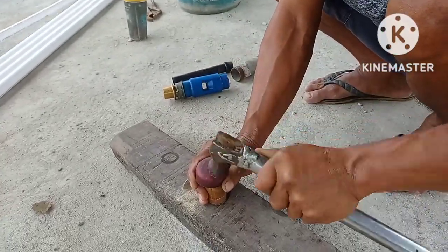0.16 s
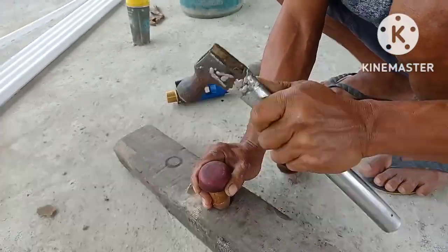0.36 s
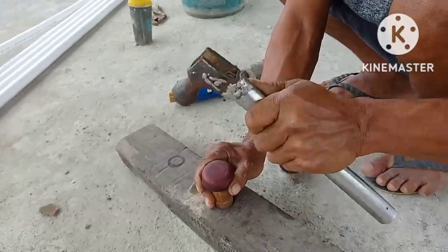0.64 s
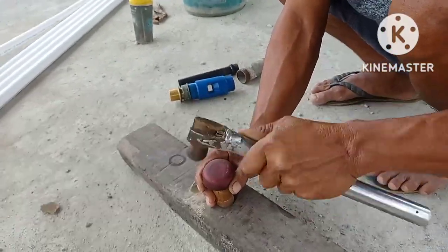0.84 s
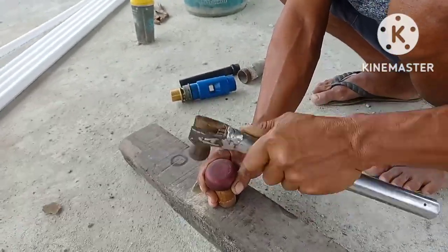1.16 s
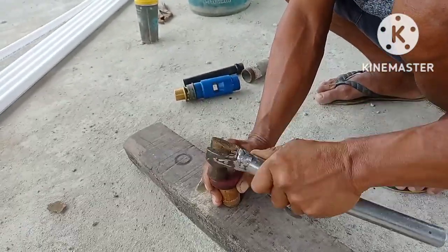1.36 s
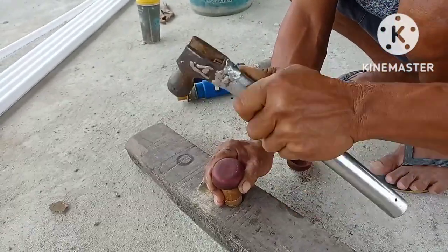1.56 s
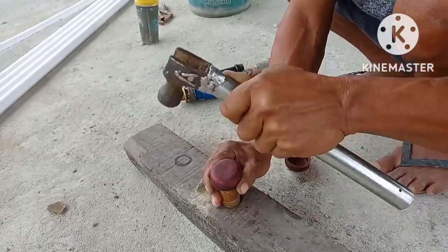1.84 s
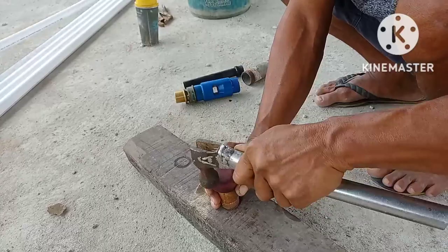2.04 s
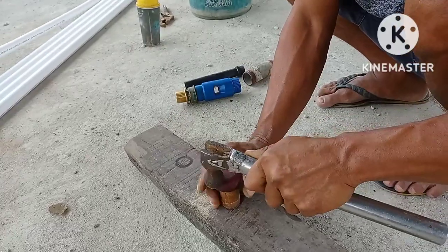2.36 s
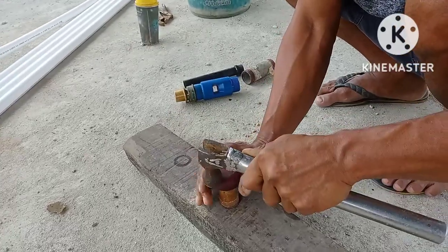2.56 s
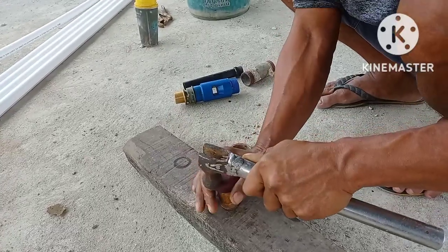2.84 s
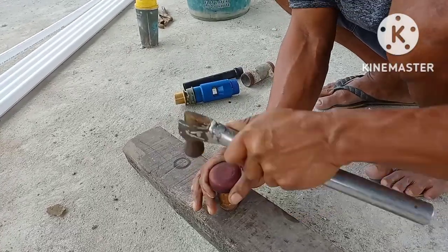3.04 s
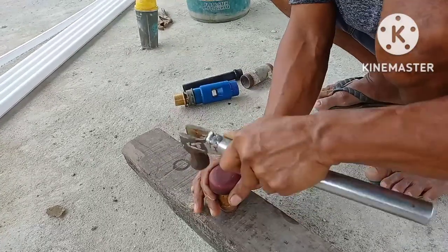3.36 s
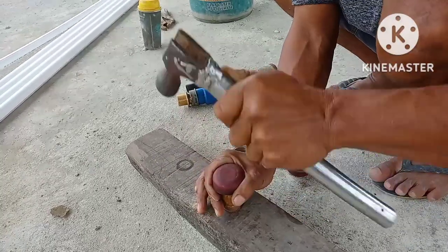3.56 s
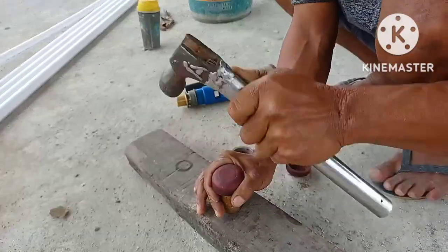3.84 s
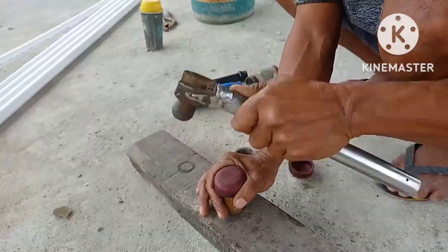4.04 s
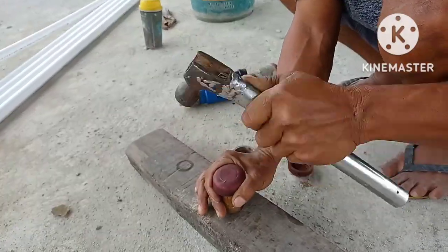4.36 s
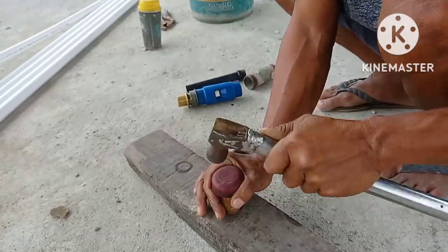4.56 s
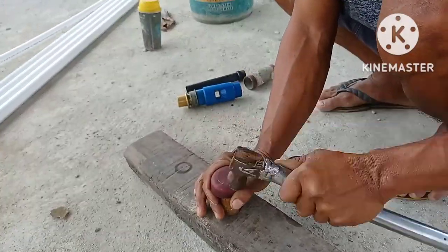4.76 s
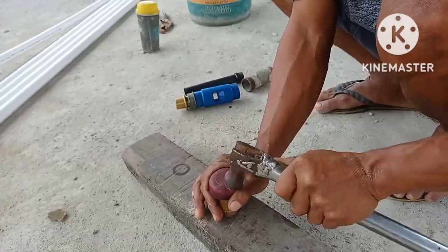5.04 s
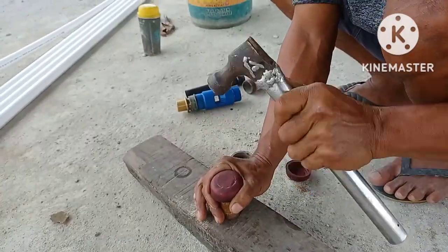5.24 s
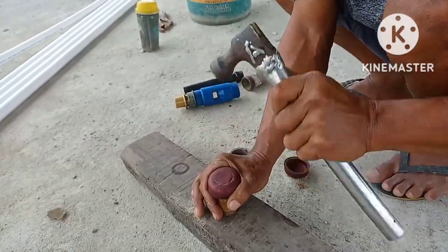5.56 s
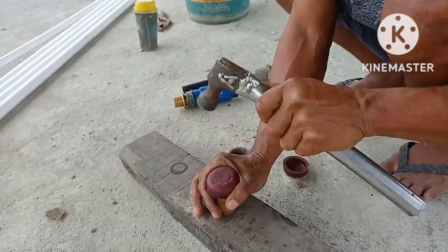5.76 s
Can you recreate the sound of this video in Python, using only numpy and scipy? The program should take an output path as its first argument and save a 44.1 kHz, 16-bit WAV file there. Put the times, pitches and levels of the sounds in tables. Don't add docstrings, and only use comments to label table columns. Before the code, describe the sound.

Seventeen loud, dry hammer knocks with a sharp steel crack and walled-yard echoes, broken by a gap of small metallic clinks and handling.

```python
import sys
import numpy as np
from scipy import signal
from scipy.fft import rfft, irfft, next_fast_len
from scipy.io import wavfile
from scipy.ndimage import uniform_filter1d, minimum_filter1d, map_coordinates

SR = 44100
rng = np.random.default_rng(int(sys.argv[2]) if len(sys.argv) > 2 else 0)


def master_out(mix):
    frames = np.transpose(np.atleast_2d(mix))
    ceiling = np.clip(frames, -1, 1)
    pcm = np.round(ceiling * 32767).astype(np.int16)
    wavfile.write(sys.argv[1], SR, pcm)


def volts(x):
    e = np.asarray(x, float) / 20
    return 10 ** e


N = 259749
T = np.arange(SR // 4) / SR

# (time [s], peak [dB], thud [dB], high ring [dB], echo [dB])
BLOWS = [(0.02, 1.5, -30.5, -10, 3), (0.319, 2.5, -30, -8.5, 2), (0.631, 2.5, -29, -9.5, 2),
         (0.922, 0, -29.5, -6.5, 3.5), (1.226, 5, -26.5, -9, 4), (1.526, 5.5, -29.5, -9, 5),
         (1.825, 4, -24, -8, 4.5), (2.128, 7, -26.5, -9.5, 6), (3.449, 7, -24.5, -9.5, 6.5),
         (3.772, 7.5, -34.5, -10, 5), (4.059, 5.5, -27, -12.5, 3.5), (4.344, 6.5, -28, -13.5, 4.5),
         (4.628, 7, -27, -11.5, 3), (4.934, 3, -37, -7.5, 4), (5.216, 2, -34.5, -7, 3),
         (5.486, 8, -36.5, -13.5, 5), (5.776, 7.5, -27, -14, 4)]
# (frequency [Hz], level [dB], t60 [s])
BLOCK_MODES = [(827.3, -7, 0.021), (1072.5, -4.5, 0.02), (1490, .6, 0.017), (1657, -4, 0.018)]
# (frequency [Hz], level [dB], t60 [s])
PUNCH_MODES = [(2112, 1.5, 0.021), (2279, -8.5, 0.028), (2520, -1.5, 0.017), (2763, -7.5, 0.023),
               (3059, -11.5, 0.021), (3576, -10, 0.01)]
# (frequency [Hz], level [dB], t60 [s])
THUD_MODES = [(156.6, -16, 0.013), (280.5, 6, 0.02)]
# (frequency [Hz], level [dB], t60 [s])
BEND_MODES = [(449, 5, 0.024), (570, -2, .02)]
# (frequency [Hz], level [dB], t60 [s])
HEAD_MODES = [(5840, -46, .13)]
# (frequency [Hz], level [dB])
KNOCK_SPECTRUM = [(300, 3), (700, -9.5), (1500, -3.5), (2500, -2), (3500, -11.5), (5000, -27.5)]
# (frequency [Hz], level [dB])
CRACK_SPECTRUM = [(2500, -64), (4500, -14), (7000, 12), (10000, -0.5), (15000, -11)]
# (time [s], peak [dB], pitch [Hz], brightness [dB])
CLINKS = [(0.2608, -44, 3500, -10), (0.2843, -48, 3500, -4), (0.5826, -34, 2400, -18),
          (0.7463, -20.5, 2600, -33), (1.6033, -18, 3000, -22), (1.727, -9, 3400, -11),
          (1.8798, -10.5, 3720, -11), (2.609, -22, 2600, -15), (2.71, -31, 2600, -15),
          (2.8123, -30.5, 2000, -9), (2.8337, -27, 2200, -28), (2.885, -32, 2460, -26),
          (3.0794, -44, 2770, -19), (3.0964, -33, 3780, -9), (3.1143, -28.5, 3790, -5.5),
          (3.1324, -36, 3980, -13), (3.147, -39, 3940, -25), (3.176, -33, 3000, -20),
          (3.341, -32.5, 3050, -12), (3.44, -22, 4000, -1), (3.767, -11, 2470, -21),
          (3.952, -24, 2540, -33), (4.0243, -30, 3940, -28), (4.054, -12, 2480, -14),
          (4.5187, -31.5, 3980, -18), (4.7205, -17, 2300, -28), (4.776, -36.5, 2600, -7),
          (5.7374, -14.5, 3180, -13)]
# (frequency [Hz], level [dB], t60 [s])
CUP_MODES = [(1490, 1, .045), (2460, -1, .05), (2780, -1, .07), (3640, 0, .035), (3950, 0, .04),
             (4770, -2, .05), (6300, -17, .07), (9000, -13, .06), (10070, -26, .1), (11440, -8, .04),
             (13760, -24, .15), (14200, -34, .15)]
# (time [s], tick [dB], brightness [dB], ring [dB], favoured frequency [Hz])
CUP_TOUCHES = [(0.7961, -17.5, -25, -21, 8000), (0.822, -27, -12, -38, 9000),
               (0.8624, -37, -21, -34, 11400), (1.0335, -21, -22, -20, 4000), (1.14, -40, -30, -39, 4770),
               (1.3841, -30, -18, -30, 4770), (1.631, -24, -22, -40, 5000), (2.666, -23, -26, -25, 3300),
               (2.7243, -10, -19, -15, 3950), (2.77, -36, -30, -38, 3640), (2.8425, -21, -21, -19, 3640),
               (2.97, -38, -22, -31, 4770), (2.9867, -33, -15, -27, 2460), (3.0085, -27, -34, -25, 2600),
               (3.0624, -37, -23, -36, 3640), (3.1633, -29, -14, -15, 2780), (3.353, -39, -6, -34, 3950),
               (3.37, -44, -6, -36, 3950), (3.39, -44, -10, -37, 3950), (5.351, -23, -39, -38, 4770)]
# (frequency [Hz], level [dB], t60 [s])
TUBE_MODES = [(5450, 0, .05), (6150, -9, .055), (7490, -3, .045), (8060, 0, .045), (9120, -12, .07),
              (10460, -9, .055), (12020, -5, .03), (12640, -9, .035), (13170, -22, .06), (15130, -9, .04)]
# (time [s], tick [dB], brightness [dB], ring [dB], favoured frequency [Hz])
TUBE_TOUCHES = [(0.784, -20, -15, -43, 10400), (1.0514, -20, -15, -30, 8500), (1.3845, -26, -26, -35, 9500),
                (1.4764, -24, -20, -31, 6000), (1.489, -20, -8, -31, 8060), (1.6494, -25, -24, -44, 10400),
                (1.77, -38, -10, -40, 9120), (3.6283, -14.5, -18, -20, 7800), (3.6727, -8, -18, -21, 6500),
                (3.681, -1, -13, -17, 7500), (3.726, -30, -21, -34, 8060)]
# (time of maximum [s], level [dB], rise [s], fall [s])
SCUFFS = [
    (.264, -51.5, 0.028, .04),
    (3.37, -68, .3, .15),
    (3.69, -44, .01, 0.074),
    (4.232, -70, .13, .2),
    (4.518, -49, .012, .055),
    (4.87, -66, 0.28, 0.049),
]
# (frequency [Hz], level [dB])
GRIT_SPECTRUM = [(2500, -16), (4200, 0), (6000, -9), (8000, -3), (10300, -5), (12000, -9), (13700, -4),
                 (15200, -10)]
# (time of maximum [s], level [dB], rise [s], fall [s])
JINGLES = [
    (.8, -47, .02, .25),
    (1.1, -59, .06, .3),
    (1.93, -60, .03, .3),
    (2.76, -59, .03, 1.6),
    (5.36, -59, 0.014, .2),
]
# (frequency [Hz], bandwidth [Hz], level [dB])
LOOSE_RESONANCES = [(2790, 40, -5), (3640, 40, -6), (4030, 40, -12), (4780, 40, 0), (6300, 40, -9),
                    (11500, 50, -14)]
# (delay [s], level [dB], flutter [dB], strongest frequency [Hz])
ECHOES = [(0.044, 10, -14, 1000), (0.051, 8, -6, 1400), (.059, 9, -14, 2400), (0.112, 5, -12, 2320),
          (0.151, 4, -3, 1400), (.2, -3, -4, 1400)]
# (delay [s], level [dB])
SWELL = [(.042, -48), (.044, 9.5), (.07, 0.5), (.09, -6), (.135, -2), (.15, 4), (.25, -1), (.4, -6.5),
         (.7, -28)]
# (frequency [Hz], level [dB])
YARD_SPECTRUM = [(120, -40), (200, -31), (236, -20.5), (446, -15), (599, -20.5), (817, -4.5), (1120, -7),
                 (1380, -2.5), (1570, -8), (2370, -4.5), (3870, -21), (6430, -54), (7950, -42),
                 (10000, -51), (13000, -95), (22000, -120)]
# (frequency [Hz], t60 [s])
AIR_LOSS = [(500, 1.05), (2000, 1.21), (5000, 0.8), (9000, 0.84)]
# (frequency [Hz], level [dB], t60 [s])
FLUTTER_MODES = [(390, 6, .022), (450, 4, 0.022), (830, 4, 0.027), (1000, 4, .028), (1240, 6, .022),
                 (1370, 4, 0.02)]
# (frequency [Hz], level [dB])
FLOOR_SPECTRUM = [(200, -8), (400, -2), (800, -4), (1300, -7.5), (2460, -2), (3770, -11.5), (5000, -26),
                  (6400, -33), (7600, -18.5), (8300, -15.5), (9400, -28.5), (11200, -45), (15000, -46)]
# (frequency [Hz], level [dB])
RUMBLE_SPECTRUM = [(25, -25), (60, -2), (130, 6), (200, -1), (400, -16)]
# (time [s], level [dB])
WIND = [(0.0, -57), (0.13, -55), (0.64, -56), (1.06, -50), (1.52, -55), (2.02, -54), (2.28, -55),
        (3.2, -52), (3.33, -49), (3.46, -54), (3.76, -59), (5.25, -55), (5.76, -58), (5.89, -55)]
# (time of maximum [s], level [dB], rise [s], fall [s])
RUSTLES = [
    (3.245, -69, .06, .05),
    (3.3, -67, .03, .07),
    (3.375, -63, .1, .09),
    (4.25, -72, .1, .12),
    (4.83, -72, .1, .12),
]


def hammer():
    out = np.zeros(N)
    phase = 70 * T + 1.02 * (1 - np.exp(-T / 0.0029))
    thump = np.sin(2 * np.pi * phase) * volts(-60 * T / 0.038) * (1 - np.exp(-T / 0.0005))
    for s, db, thud_db, high_db, _ in BLOWS:
        crack_db = -16 + 0.6 * (high_db + 10)
        bend_db = 1.8 * min(db - 5.5, 1)
        low = 0.51 * ring(THUD_MODES, 0.00051) + 0.97 * thump
        low += 0.52 * volts(bend_db) * ring(BEND_MODES, 0.0005)
        modes = ring(BLOCK_MODES, 0.001) + volts(high_db + 9.5) * ring(PUNCH_MODES, 0.00097)
        modes += volts(thud_db + 13.5) * low
        noise = volts(-11) * burst(KNOCK_SPECTRUM, 0.03)
        noise += volts(crack_db - 5) * burst(CRACK_SPECTRUM, 0.014)
        noise += volts(-23.5) * burst(YARD_SPECTRUM, 0.079)
        leather = burst(KNOCK_SPECTRUM, 0.037) * (1 - np.exp(-T / 0.0024))
        add(out, s - 0.003, volts(db - 17) * leather)
        add(out, s, volts(db + 20.5) * (1 - np.exp(-T / 0.00056)) * (noise - modes))
        add(out, s + 0.005, volts(rng.normal(0, 2.5)) * ring(HEAD_MODES, 0.0013))
    return out


def clinks():
    out = np.zeros(N)
    for s, db, hz, bright_db in CLINKS:
        add(out, s, tick(db, hz, bright_db))
    for modes, touches in [(CUP_MODES, CUP_TOUCHES), (TUBE_MODES, TUBE_TOUCHES)]:
        for s, db, bright_db, ring_db, hz in touches:
            focus_db = 7 - 0.75 * (db + 12)
            contact = tick(db, np.clip(hz, 2400, 3600), bright_db)
            add(out, s, contact + loose_steel(modes, ring_db, hz, focus_db))
    return out


def tick(db, hz, bright_db):
    t60 = max(0.022 + 0.0003 * (db + 25), 0.012)
    body = burst([(hz / 4.9, -20), (hz, 0), (hz * 1.5, -11)], 3 * t60)
    spit = volts(bright_db) * burst([(5000, -10), (8000, 15), (14500, -4)], 2.2 * t60)
    stray_modes = [(hz * rng.uniform(0.6, 1.35), -3, 3 * t60) for _ in range(4)]
    partials = ring(stray_modes, 0.00051)
    envelope = volts(db - 45 * (T / t60) ** 2) * (1 - np.exp(-T / 0.0012))
    return envelope * (body + 0.45 * partials + spit)


def loose_steel(modes, db, favoured_hz, focus_db):
    hz, mode_db, t60 = np.transpose(modes)[:, :, None]
    luck = rng.standard_normal((len(modes), 40))
    waver = 3.5 * np.array([map_coordinates(row, [T * 120]) for row in luck])
    waver = waver + 3 * luck[:, -1:]
    focus = focus_db * np.abs(np.log2(hz / favoured_hz))
    level = db + mode_db - focus + waver - 60 * T / t60
    return (volts(level) * np.sin(2 * np.pi * hz * T)).sum(0) * (1 - np.exp(-T / 0.0017))


def scuffs():
    lumps = volts(8 * held_noise(64))
    grit = unit(coloured(lumps * rng.standard_normal(N), GRIT_SPECTRUM))
    f = np.fft.rfftfreq(N, 1 / SR)
    response = sum(volts(db) * 1j * f * width / (centre ** 2 - f * f + 1j * f * width)
                   for centre, width, db in LOOSE_RESONANCES)
    touches = volts(6 * held_noise(256)) * rng.standard_normal(N)
    jingle = unit(irfft(rfft(touches) * response ** 2, N))
    return volts(10) * spans(SCUFFS) * grit + volts(3.5) * spans(JINGLES) * jingle


def yard():
    delay = np.arange(SR * 3 // 4) / SR
    swell = volts(np.interp(delay, *np.transpose(SWELL)))
    hz, t, z = signal.stft(swell * rng.standard_normal(len(delay)), SR, nperseg=256)
    clumps = uniform_filter1d(rng.standard_normal(z.shape), size=2, axis=0)
    clumps = unit(uniform_filter1d(clumps, size=4, axis=1))
    same = signal.istft(z * volts(3.5 * clumps - 1.5), SR, nperseg=256)[1][:len(delay)]
    # 48.7 ms and 1.2 dB lost a round, a -10 dB noisy share
    returns = [(0.0955 + k * 0.0487, 7 - 10 - k * 1.2, 10, 950) for k in range(7)]
    for s, db, flutter_db, centre in list(ECHOES) + returns:
        rough = burst([(300, -12), (centre, 6), (0.92 * centre, -4), (9000, -4)], 0.023)
        add(same, s, volts(db - 4.5) * (rough + volts(flutter_db) * ring(FLUTTER_MODES, 0.0025)))
    out = np.zeros(N)
    air = volts(-60 * t / along(AIR_LOSS, hz)[:, None])
    for s, *_, echo_db in BLOWS:
        fresh = 0.55 * swell * rng.standard_normal(len(delay))
        z = signal.stft(same + fresh, SR, nperseg=256)[2]
        tint = volts(2.5 * uniform_filter1d(rng.standard_normal(len(hz)), size=5))
        add(out, s, volts(echo_db) * signal.istft(z * tint[:, None] * air, SR, nperseg=256)[1])
    lead = round(BLOWS[0][0] * SR)
    out[:lead] += out[round(BLOWS[1][0] * SR) - lead:][:lead]
    return volts(-22) * unit(coloured(out, YARD_SPECTRUM))


def outdoors():
    wind_db = np.interp(np.arange(N) / SR, *np.transpose(WIND)) + 4.5
    rumble = coloured(rng.standard_normal(N), RUMBLE_SPECTRUM)
    wind = volts(wind_db) * unit(volts(3.3 * slow_noise(16)) * rumble)
    floor = volts(-44) * unit(coloured(rng.standard_normal(N), FLOOR_SPECTRUM))
    top = coloured(rng.standard_normal(N), [(10000, -14), (12500, -10), (13700, 0), (15200, -6)])
    rustle = volts(3 * slow_noise(6) + 4.5 * slow_noise(90)) * unit(top)
    return wind + floor + (volts(-77.5) + spans(RUSTLES)) * rustle


def ring(modes, attack):
    hz, db, t60 = np.transpose(modes)[:, :, None]
    luck_db = 1.5 * rng.standard_normal((len(modes), 1))
    detune = 0.006 * rng.standard_normal((len(modes), 1))
    waves = volts(db + luck_db - 60 * T / t60) * np.sin(2 * np.pi * hz * (1 + detune) * T)
    return waves.sum(0) * (1 - np.exp(-T / attack))


def burst(spectrum, t60):
    return unit(coloured(rng.standard_normal(len(T)), spectrum)) * volts(-60 * T / t60)


def coloured(x, spectrum):
    size = next_fast_len(len(x) + SR // 4)
    points = [(spectrum[0][0] / 2, -90)] + list(spectrum) + [(spectrum[-1][0] * 1.1, -90)]
    gain = volts(along(points, np.fft.rfftfreq(size, 1 / SR)))
    return irfft(rfft(x, size) * gain, size)[:len(x)]


def along(points, hz):
    f, v = np.transpose(points)
    return np.interp(np.log(hz + 1), np.log(f + 1), v)


def unit(x):
    return x / np.sqrt(np.mean(x ** 2) + 1e-20)


def add(track, s, sound):
    i = round(s * SR)
    track[i:i + len(sound)] += sound[:len(track) - i]


def held_noise(hold):
    return np.repeat(rng.standard_normal(N // hold + 1), hold)[:N]


def slow_noise(rate):
    values = rng.standard_normal(round(rate * N / SR) + 4)
    return map_coordinates(values, [np.arange(N) * rate / SR])


def spans(rows):
    time = np.arange(N) / SR
    gain = np.zeros(N)
    for s, db, rise, fall in rows:
        gain += volts(np.interp(time, [s - rise, s, s + fall], [db - 25, db, db - 25], -120, -120))
    return uniform_filter1d(gain, size=200)


def scene():
    return (hammer() + clinks() + scuffs() + yard() + outdoors())[None]


def ducking(x):
    frame, phase, ramp = 0.02, 0.012, 0.0062
    knee_db, share, most_db, release_db = -16, 0.41, 19, 4
    edges = phase - frame + frame * np.arange(int(N / SR / frame) + 2)
    edges = np.round(edges * SR).astype(int)
    peak = -minimum_filter1d(-np.abs(x), size=1764)
    ahead = peak[np.clip(edges + 500, 0, N - 1)]
    cut = np.clip(share * (20 * np.log10(ahead + 1e-9) - knee_db), 0, most_db)
    for k in range(1, len(cut)):
        cut[k] = max(cut[k], cut[k - 1] - release_db)
    knots = np.ravel([edges, edges + ramp * SR], order="F")
    levels = np.ravel([np.r_[cut[0], cut[:-1]], cut], order="F")
    return volts(-np.interp(np.arange(N), knots, levels))


def low_pass(x):
    return signal.sosfilt(signal.butter(12, 16820, fs=SR, output="sos"), x)


def record(dry):
    x = signal.sosfilt(signal.butter(2, 70, "highpass", fs=SR, output="sos"), dry[0])
    x = x * ducking(x)
    x = x / (1 + np.abs(x / 0.95) ** 5) ** (1 / 5)
    x = signal.sosfiltfilt(signal.butter(16, 15700, fs=SR, output="sos"), x)
    return low_pass(x[None])


dry = scene()
out = record(dry)
master_out(out)
```